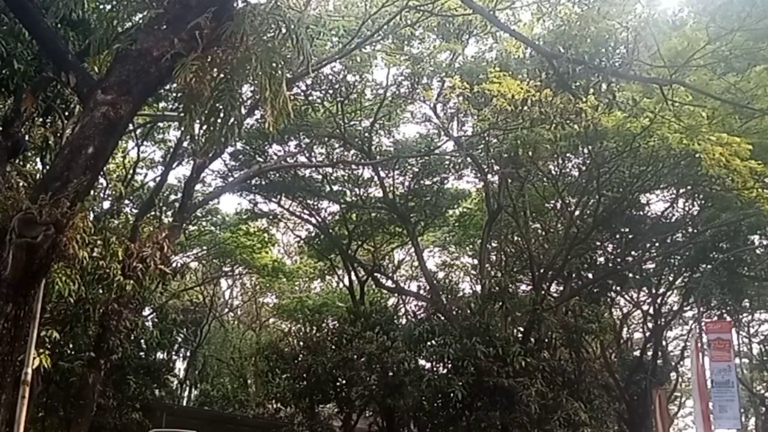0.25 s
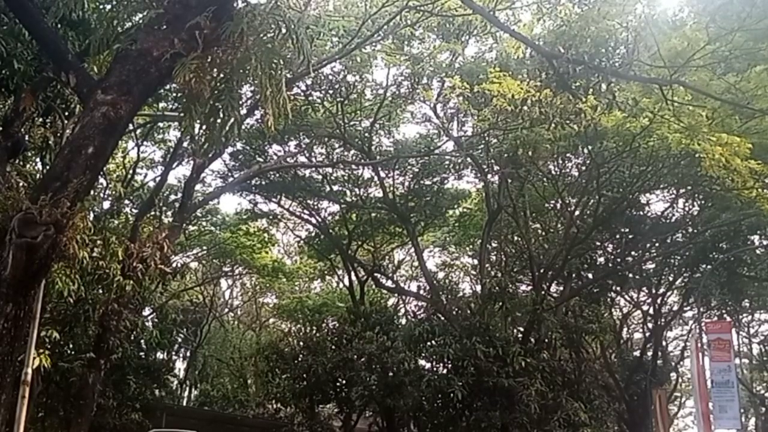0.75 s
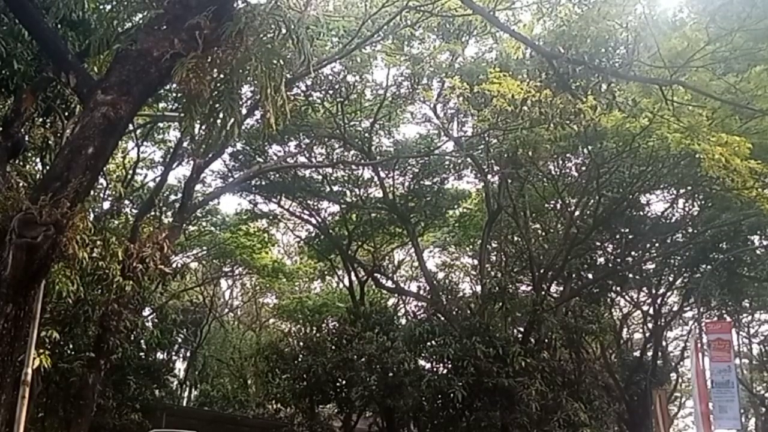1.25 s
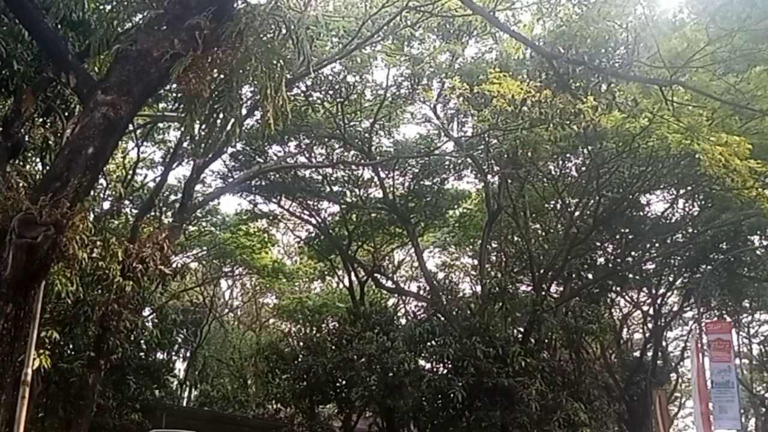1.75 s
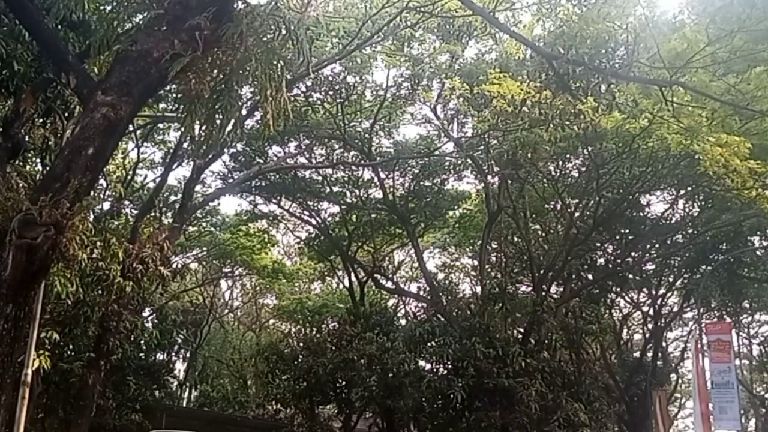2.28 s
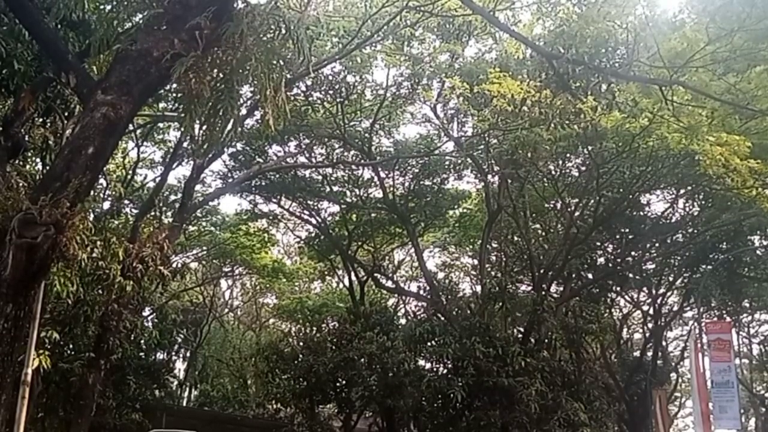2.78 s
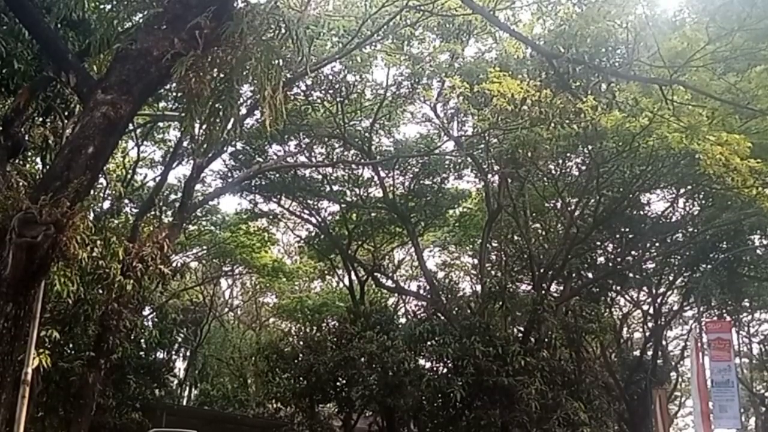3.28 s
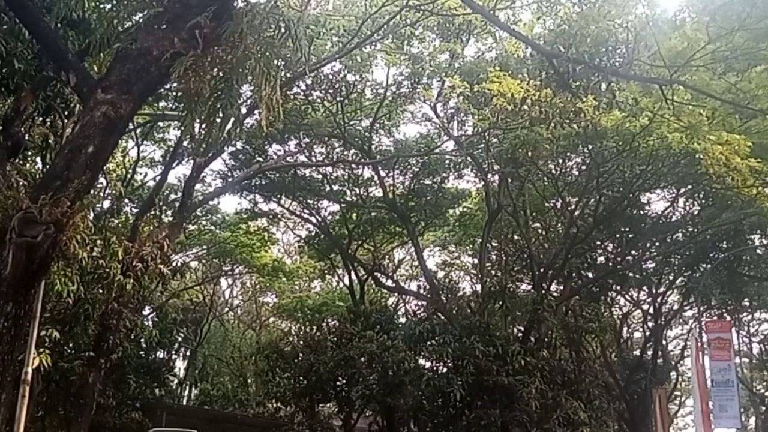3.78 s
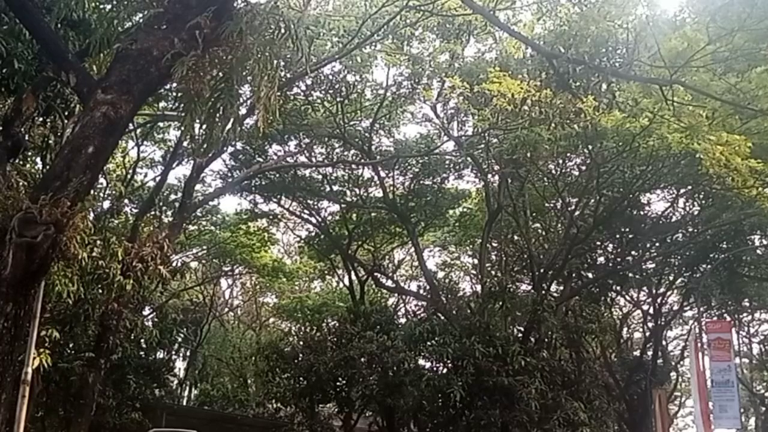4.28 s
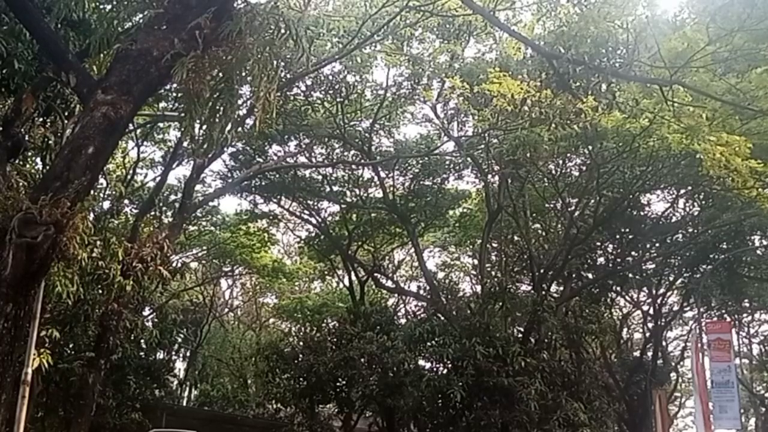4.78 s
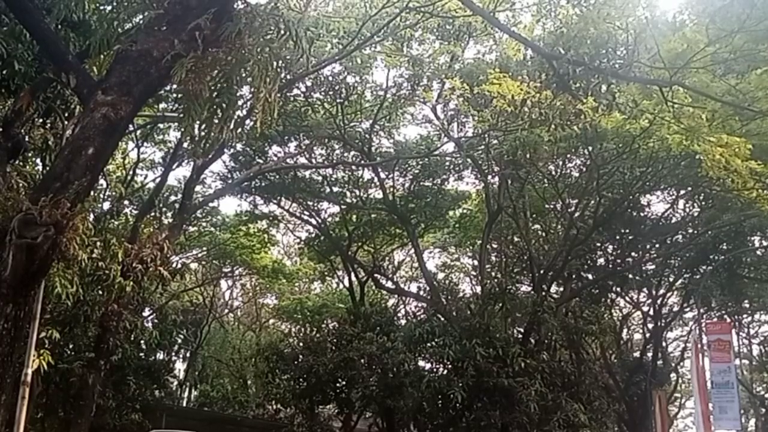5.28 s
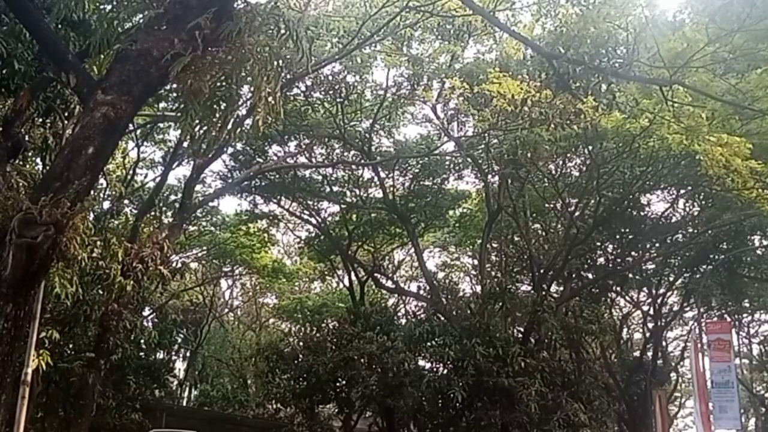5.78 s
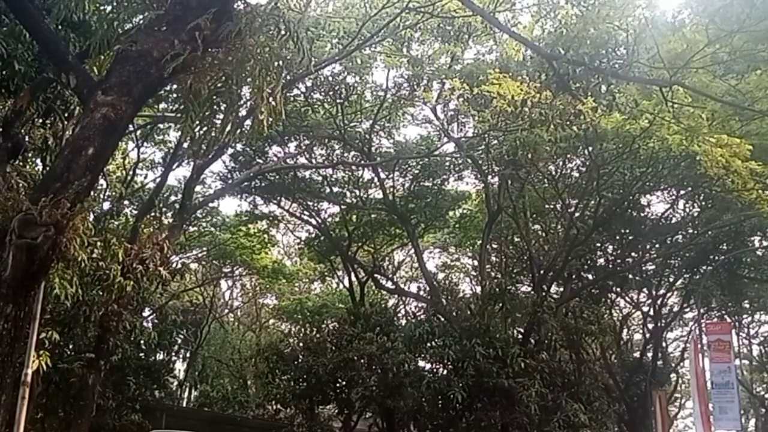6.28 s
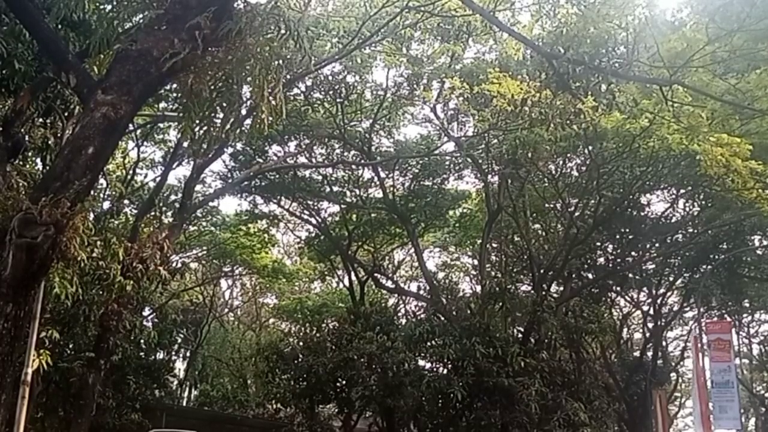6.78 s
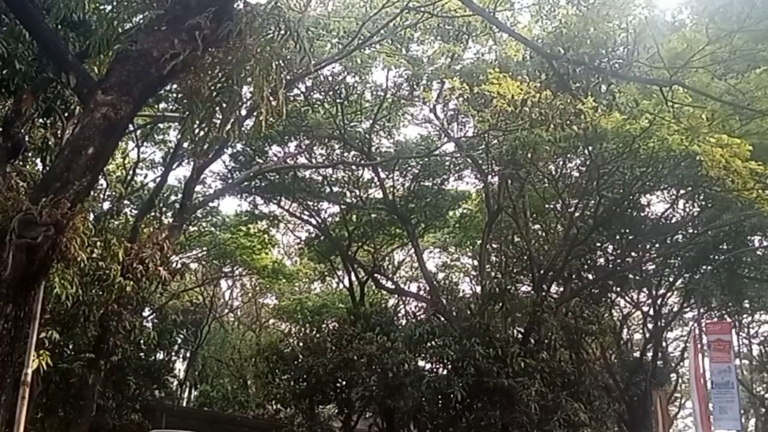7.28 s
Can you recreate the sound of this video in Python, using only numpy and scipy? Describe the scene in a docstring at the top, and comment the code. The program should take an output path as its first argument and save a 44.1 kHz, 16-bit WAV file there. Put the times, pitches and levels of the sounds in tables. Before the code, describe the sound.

Loud high bird chips, a raspy chatter, then a quick run of slurred whistles among trees, with soft deep traffic rumbling underneath.

```python
"""A street lined with trees: small birds call close overhead while traffic rumbles below.
Sharp warbled chips come first, then a buzzy chatter, a few more chips, then a run of slurred whistles.
Each call is a gliding tone; leaves scatter it as many tiny echoes, fainter birds answer, a twig ticks once.
The traffic is shaped noise; one engine is a low tone with one overtone that comes and goes.
The recorder's limiter ducks the whole sound, street included, when the calls are too loud."""
import sys
import numpy as np
from scipy import signal
from scipy.fft import rfft, irfft, next_fast_len
from scipy.io import wavfile
from scipy.ndimage import uniform_filter1d, minimum_filter1d, map_coordinates

SR = 44100
rng = np.random.default_rng(int(sys.argv[2]) if len(sys.argv) > 2 else 0)


def materialize(psi):
    """Save the field psi as 16-bit PCM at rate SR to the path in sys.argv[1].

    A 1-D psi becomes a single channel; in a 2-D psi each row is a channel.
    """
    bounded = np.clip(np.atleast_2d(psi).T, -1, 1)
    quanta = np.round(bounded * 32767).astype(np.int16)
    wavfile.write(sys.argv[1], SR, quanta)


N = 332514
TIME = np.arange(N) / SR

# Levels in the tables are set before echoes, mixing and microphone. Positive left-right dB: left is louder.
# Spectrum of the traffic noise: (frequency [Hz], relative level per Hz [dB])
STREET_SPECTRUM = [(25, -15), (45, -21), (70, -6.5), (100, 0), (200, -7.5), (400, -17.5), (800, -24),
                   (1600, -26), (4000, -29), (7500, -36), (9000, -54.5), (13500, -45.5), (15300, -66.5)]
# How alike the street is on both sides: (frequency [Hz], correlation [-1 to 1])
STREET_LIKENESS = [(30, 0.79), (70, 1), (125, 0.96), (250, 0.94), (500, 0.76), (1000, -0.15), (2000, -0.02),
                   (8000, -0.0024)]
# Loudness of the traffic: (time [s], level [dB])
TRAFFIC_LEVEL = [(0, -19.5), (.4, -18.5), (.8, -20), (2.2, -19.5), (3.6, -19.5), (4.8, -19.5), (6.6, -19.5),
                 (7.54, -20.3)]
# Exhaust note of one engine: (time [s], firing rate [Hz], level [dB])
ENGINE_NOTE = [(0, 98, -22.5), (.5, 100, -22), (1.5, 112, -45), (4.2, 110, -23), (4.7, 112, -21),
               (5.3, 110, -22), (5.8, 108, -18), (6.6, 106, -14.5), (7.0, 107, -20), (7.54, 112, -18)]
# Distant birds: (start [s], length [s], first pitch [Hz], last pitch [Hz], level [dB])
FAR_BIRD_CALLS = [(2.11, 0.05, 4150, 4050, -47.5), (2.183, 0.16, 4490, 4470, -32.5),
                  (3.396, 0.095, 4155, 4620, -30.5), (3.545, 0.095, 6490, 5650, -25.5),
                  (3.743, 0.079, 5220, 5790, -26), (3.797, .04, 5100, 5070, -37),
                  (4.095, 0.065, 5500, 5220, -34), (4.158, 0.043, 4440, 3850, -27),
                  (7.433, 0.088, 4400, 4720, -30)]
# Resonance of the small birds' throat and beak: (frequency [Hz], gain [dB])
THROAT_RESONANCE = [(3000, -24), (3800, -6), (5000, -8.5), (6300, 1), (7100, -0.5), (8300, -18.5),
                    (9300, -23.5), (11000, -23.5), (15000, -25.5)]
# Warbled chips: (start [s], length [s], onset pitch [Hz], crest pitch [Hz], first dip pitch [Hz],
# last dip pitch [Hz], time to the first dip [s], warbles [per s], level [dB], fade over the note [dB],
# beak opening [factor on the throat resonance], left-right [dB])
CHIP_NOTES = [(0.444, 0.042, 5070, 9470, 7560, 6700, 0.025, 100, 13.5, -0.5, 1.094, 1),
              (0.899, 0.053, 4900, 8530, 6550, 6550, 0.016, 124, 12.5, 19, 1.13, -2.5),
              (1.460, 0.047, 4800, 8700, 6860, 6180, 0.013, 89, 21, -3, 0.99, 1.5),
              (1.7882, .054, 5590, 8800, 6520, 6260, 0.008, 75, 19, -11, 1, 2.5),
              (3.614, 0.036, 3450, 9300, 5300, 5400, .021, 62, 17.5, 2, 1.026, 4),
              (3.923, 0.061, 3700, 9460, 6470, 6160, .019, 101, 19, -2, 1, 1.5),
              (4.329, 0.13, 5430, 9360, 7380, 8700, 0.029, 52.5, 7, 7.5, 1.176, 0)]
# Buzzy notes: (start [s], length [s], pitch [Hz], upward scoop [share of pitch], warble rate [Hz],
# warble depth [share of pitch], level [dB], fundamental at the start [dB], left-right [dB])
BUZZ_NOTES = [(2.384, 0.073, 3890, 0.081, 324, 0.069, 12, 6, 0.5),
              (2.549, .063, 3835, .08, 289.6, 0.066, 14, 4.5, 0),
              (2.868, 0.061, 3270, 0.04, 245, 0.056, 17.5, 3, 5),
              (2.977, .061, 3270, 0.11, 352, 0.036, 18.5, 2, 3),
              (3.092, 0.055, 3243, .09, 310, .058, 16.5, 3.5, 2.5),
              (3.209, .058, 3710, 0.14, 339, 0.074, 12.5, 7, .5)]
# Overtones of the whistler: (frequency of the overtone [Hz], level relative to the note [dB])
WHISTLE_OVERTONES = [(5000, -22), (6200, -19), (7500, -27.5), (9000, -37), (12500, -47)]
# Arched whistles: (start [s], length [s], first pitch [Hz], turning pitch [Hz], last pitch [Hz],
# place of the turn [0-1], level [dB], crescendo [dB], left-right [dB], left-right drift over the note [dB])
ARCHED_WHISTLES = [(4.906, 0.056, 4030, 5460, 3930, 0.51, 9.5, 13, -1.5, -9),
                   (4.921, 0.05, 4500, 4930, 4800, 0.56, 4.5, 2, 11, 1),
                   (5.057, .039, 3910, 4110, 4970, 0.4, 2, 17, 3, 12),
                   (5.099, 0.0253, 4450, 4410, 4180, 0, 7, -2, 8, 2),
                   (5.179, .042, 4230, 4180, 3980, .3, -3, 2, -4, -2),
                   (5.221, 0.05, 4320, 4327, 3830, 0.1, -0.5, -8, 5.5, 10),
                   (5.504, 0.1, 4130, 4227, 3710, 0.6, 0.5, 14, 7.5, -8),
                   (5.584, 0.044, 3790, 3560, 3140, 0.69, 1.5, -7.5, 1, 5),
                   (5.724, 0.072, 3480, 4090, 3630, 0.63, 1.5, 17, 8.5, 5),
                   (5.91, 0.078, 4210, 4334, 3650, 0.48, 6.5, 12.5, 2.5, 14),
                   (6.264, .086, 3687, 4136, 3760, .65, 6.5, 9.5, 8, -6),
                   (6.624, 0.096, 3666, 3693, 3528, 0.43, 4, 8, 5.5, 1),
                   (6.822, .047, 2606, 2967, 2350, 0.55, 0.5, -1, 6, 2),
                   (6.987, .042, 3656, 3586, 4075, 0.3, -5, 18, 7.5, 5),
                   (7.025, 0.024, 3970, 4030, 3880, 0.33, 1.5, -5, 0, -7),
                   (7.057, 0.023, 3960, 4245, 3860, 0.42, 11, -12, -2.5, 4)]
# Falling slurs: (start [s], length [s], first pitch [Hz], last pitch [Hz], level [dB], crescendo [dB],
# left-right [dB])
FALLING_SLURS = [(5.311, 0.076, 3435, 2820, -0.5, 15, 6.5), (6.045, 0.074, 3574, 2777, -1, 14, 6.5),
                 (6.414, 0.088, 3095, 2415, -4, 4.5, 1), (6.769, .060, 3090, 2590, -4, 12, 5.5),
                 (7.129, .080, 3362, 2666, -1.5, 6.5, 10)]
# Treble of the left and of the right microphone: (frequency [Hz], gain [dB])
LEFT_TREBLE = [(8000, 0), (10500, 7), (13500, -3), (15300, 11)]
RIGHT_TREBLE = [(8000, 0), (10500, -11), (13500, -16.5), (15300, 2.5)]

CUTOFF_HZ = 15850
UPSWEEP_S, CREST_SAG_HZ_PER_S = .0035, 7000   # how fast a chip leaps to its crest; how the crests sink
OVERTONE_FLICKER_DB = 3.5
ARCH_BEND, SLUR_EASE = 1.6, 0.46   # roundness of an arch; share of a slur that eases in and out


def from_db(db):
    """Turn decibels into gain."""
    return 10 ** (np.asarray(db) / 20)


def rms_one(x):
    """Scale to an average strength (rms) of 1."""
    return x / np.sqrt(np.mean(x ** 2) + 1e-20)


def curves(rows, t):
    """Join the points of each table column by straight lines, read at times t."""
    s, *columns = np.transpose(rows)
    return [np.interp(t, s, c) for c in columns]


def at_hz(points, hz):
    """Read a spectrum on a log-frequency axis."""
    f, value = np.transpose(points)
    return np.interp(np.log(np.maximum(hz, 1)), np.log(f), value)


def drift(rate, size):
    """Smooth chance of spread 1 that changes about rate times a second."""
    knots = rng.standard_normal(1024 + size // 32)
    return map_coordinates(knots, [np.arange(size) * rate / SR], order=3, mode="wrap")


def phase_of(hz):
    """Add up a moving pitch into a running phase."""
    return 2 * np.pi * np.cumsum(hz) / SR


def gate(t, attack, release):
    """Soft start and end of a note on its own time axis."""
    rise = np.clip((t - t[0]) / attack, 0, 1)
    fall = np.clip((t[-1] - t) / release, 0, 1)
    return np.sin(np.pi / 2 * rise * fall) ** 2


def swell(along, arch_db, crescendo_db):
    """Effort in dB along a note (0-1): an arch around the middle, leaning towards one end."""
    return crescendo_db * (along - .5) - arch_db * (2 * along - 1) ** 2


def add(out, start, note, pan_db):
    """Place a note in the stereo field."""
    i = int(start * SR)
    sides = np.array([note * from_db(pan_db / 2), note * from_db(-pan_db / 2)])
    out[:, i:i + len(note)] += sides[:, :N - i]


def street(lump_db=2.0, pan_db=1.0):
    """Tyres and many engines blend into a rumble, most alike on both sides in the bass."""
    hz = np.arange(N // 2 + 1) * SR / N
    mid, side = rfft(rng.standard_normal((2, N)))
    alike = np.clip(at_hz(STREET_LIKENESS, hz), -1, 1)
    sides = np.array([[1], [-1]])
    # a shared part and an opposite part together give the wanted likeness
    stereo = np.sqrt(1 + alike) * mid + sides * np.sqrt(1 - alike) * side
    noise = irfft(stereo * from_db(at_hz(STREET_SPECTRUM, hz)) * (hz > 22), N)
    level_db = curves(TRAFFIC_LEVEL, TIME)[0] + lump_db * drift(10, N)
    return rms_one(noise) * from_db(level_db + sides * pan_db / 2)


def engine(wander=0.03, throb_db=2.0, second_db=-17):
    """The exhaust note of one vehicle: a tone at the firing rate and its octave, throbbing unevenly."""
    hz, level_db = curves(ENGINE_NOTE, TIME)
    phase = phase_of(hz * (1 + wander * drift(18, N)))
    loudness = from_db(level_db + throb_db * drift(16, N))
    return loudness * (np.sin(phase) + from_db(second_db) * np.sin(2 * phase))


def twig(start=3.418, level_db=-38, t60=0.095):
    """A faint dry tick among the branches: a burst of bright noise that dies away."""
    t = TIME[:SR // 10]
    out = np.zeros((2, N))
    bright_noise = np.diff(rng.standard_normal(len(t) + 1))
    tick = bright_noise * from_db(level_db - 60 * t / t60)
    add(out, start, tick * gate(t, 0.0024, .01), 2)
    return out


def far_birds(waver=0.051):
    """Faint quavering slurs from trees further off, each one wavering pure tone."""
    out = np.zeros((2, N))
    for start, length, first_hz, last_hz, level_db in FAR_BIRD_CALLS:
        t = np.arange(int(length * SR)) / SR
        hz = np.linspace(first_hz, last_hz, len(t)) * (1 + waver * drift(249, len(t)))
        add(out, start, from_db(level_db) * gate(t, 0.011, 0.02) * np.sin(phase_of(hz)), 0)
    return out


def scatter(x, t60, build_up, echoes_per_s):
    """Many small echoes off leaves and trunks, different at each microphone, dying away."""
    t = TIME[:SR]
    echoes = rng.standard_normal((2, SR)) * (rng.random((2, SR)) < echoes_per_s / SR)
    echoes = echoes * from_db(-60 * t / t60) * (1 - np.exp(-t / build_up))
    echoes = echoes / np.sqrt(np.sum(echoes ** 2, axis=1, keepdims=True) + 1e-20)
    return signal.fftconvolve(x, echoes, axes=1)[:, :N]


def left_later(x, lag_s):
    """Sound arriving at a slant reaches the left microphone a little later."""
    size = next_fast_len(N + 64)
    hz = np.arange(size // 2 + 1) * SR / size
    late = irfft(rfft(x[0], size) * np.exp(-2j * np.pi * hz * lag_s), size)
    return np.array([late[:N], x[1]])


def syrinx(hz, partials_db, beak=1):
    """Harmonics of one vibrating membrane, shaped by the throat resonance, which an open beak raises."""
    phase = phase_of(hz)
    tone = 0
    for k, db in enumerate(partials_db, 1):
        loudness = from_db(db + at_hz(THROAT_RESONANCE, k * hz / beak))
        audible = k * hz < SR / 2   # leave out what digital sound cannot hold
        tone = tone + loudness * audible * np.sin(k * phase)
    return tone


def chips(jitter=0.022, attack=0.00086, release=0.0024, swell_db=7.0, early_warble=.2):
    """A steep upsweep breaks into a fast warble, which the throat turns into a few pulses."""
    out = np.zeros((2, N))
    rasp, uneven = .04, .16
    for (start, length, onset_hz, crest_hz, first_dip_hz, last_dip_hz, dip_s, rate,
         level_db, fade_db, beak, pan_db) in CHIP_NOTES:
        t = np.arange(int(length * SR)) / SR
        turns = (t - dip_s) * rate
        # 0 at a crest, about 1 in a dip; shallower before the first dip
        dip = np.cos(np.pi * turns) ** 2 * np.where(turns < -.5, early_warble, 1)
        dip = dip * (1 + uneven * drift(rate, len(t)))
        crests_hz = crest_hz - CREST_SAG_HZ_PER_S * t
        dips_hz = np.interp(t, [dip_s, length], [first_dip_hz, last_dip_hz])
        warble_hz = (1 - dip) * crests_hz + dip * dips_hz
        hz = warble_hz + (onset_hz - warble_hz) * np.exp(-t / UPSWEEP_S)
        hz = hz * (1 + jitter * drift(886, len(t)))
        effort = from_db(level_db + swell(t / length, swell_db, -fade_db))
        effort = effort * (1 + rasp * drift(6700, len(t)))
        add(out, start, effort * gate(t, attack, release) * syrinx(hz, [0, -16], beak), pan_db)
    return out


def buzzes(swell_db=15.0, crest=.62, brighten_db=13.0, throb_db=3.0):
    """A fast, ragged vibrato also chops the loudness; the fundamental fades against its overtones."""
    out = np.zeros((2, N))
    jitter, rasp, unsteady, flutter_db = .014, .05, .18, 1.7
    for (start, length, pitch_hz, scoop, warble_hz, depth,
         level_db, fundamental_db, pan_db) in BUZZ_NOTES:
        t = np.arange(int(length * SR)) / SR
        from_crest = (t / length / crest - 1) ** 2   # pitch and loudness arch around this crest
        warble = np.sin(phase_of(warble_hz * (1 + unsteady * drift(150.3, len(t)))))
        hz = pitch_hz * (1 - scoop * from_crest + depth * warble + jitter * drift(707, len(t)))
        effort_db = level_db - swell_db * from_crest - throb_db * warble
        effort = from_db(effort_db + flutter_db * drift(365, len(t)))
        fundamental = fundamental_db - brighten_db * t / length + 2 * flutter_db * drift(782, len(t))
        tone = syrinx(hz, [fundamental, 0, -10, -8], beak=1.022)
        raspy_tone = tone * (1 + rasp * drift(4700, len(t)))
        add(out, start, effort * gate(t, 0.0025, 0.0048) * raspy_tone, pan_db)
    return out


def whistle(hz, level_db, crescendo_db, swell_db=5.5, waver=0.0089, flutter_db=1.5, rasp=0.021,
            attack_share=0.13, release=0.0028):
    """A nearly pure gliding tone with faint overtones that swells; longer notes start more softly."""
    t = TIME[:len(hz)]
    phase = phase_of(hz * (1 + waver * drift(299.2, len(t))))
    tone = np.sin(phase)
    for k in range(2, 4):
        overtone_db = at_hz(WHISTLE_OVERTONES, k * hz) + OVERTONE_FLICKER_DB * drift(95, len(t))
        tone = tone + from_db(overtone_db) * np.sin(k * phase)
    effort_db = level_db + swell(t / t[-1], swell_db, crescendo_db) + flutter_db * drift(162, len(t))
    roughness = 1 + rasp * drift(3000, len(t))
    return tone * from_db(effort_db) * roughness * gate(t, attack_share * t[-1], release)


def whistles():
    """The song: high notes that bend around a turning point, mixed with lower falling slurs."""
    out = np.zeros((2, N))
    for (start, length, first_hz, turn_hz, last_hz, turn,
         level_db, crescendo_db, pan_db, pan_drift_db) in ARCHED_WHISTLES:
        along = np.linspace(0, 1, int(length * SR))
        from_turn = np.interp(along, [0, np.clip(turn, .01, .99), 1], [1, 0, 1])
        end_hz = np.where(along < turn, first_hz, last_hz)
        hz = turn_hz + (end_hz - turn_hz) * from_turn ** ARCH_BEND
        add(out, start, whistle(hz, level_db, crescendo_db), pan_db + pan_drift_db * (along - .5))
    for start, length, first_hz, last_hz, level_db, crescendo_db, pan_db in FALLING_SLURS:
        along = np.linspace(0, 1, int(length * SR))
        fallen = (1 - SLUR_EASE) * along + SLUR_EASE * np.sin(np.pi / 2 * along) ** 2
        hz = first_hz + (last_hz - first_hz) * fallen
        add(out, start, whistle(hz, level_db, crescendo_db), pan_db)
    return out


def scene():
    """Birds above the street: direct sound, quick echoes off near leaves, a long tail from the grove."""
    high = left_later(chips(), lag_s=.00001) + left_later(buzzes(), lag_s=.000033)
    low = left_later(whistles(), lag_s=.00007)
    far = far_birds()
    near_high = from_db(-8) * scatter(high, t60=.06, build_up=.002, echoes_per_s=2500)
    near_low = from_db(-5.0) * scatter(low, t60=0.073, build_up=0.00047, echoes_per_s=3100)
    into_grove = from_db(-21.5) * high + from_db(-17) * low + far
    grove = scatter(into_grove, t60=0.42, build_up=0.0065, echoes_per_s=1200)
    birds = high + low + from_db(-4.5) * far + near_high + near_low + grove
    return birds + twig() + street() + engine()


def microphone(x, peak_hz=15200, sharpness=22.0, peak_db=8.5):
    """The small sound ports ring at the very top of the treble; the right one is duller below that."""
    hz = np.arange(N // 2 + 1) * SR / N
    x = irfft(rfft(x) * from_db([at_hz(LEFT_TREBLE, hz), at_hz(RIGHT_TREBLE, hz)]), N)
    ringing = signal.lfilter(*signal.iirpeak(peak_hz, sharpness, fs=SR), x)
    return x + from_db(peak_db) * ringing


def limiter(x, ceiling=1.0, recovery_s=0.11):
    """One gain for both sides drops at once under a peak, holds briefly and creeps back."""
    peak = np.abs(x).max(axis=0)
    top = min(ceiling, 1)
    # the shifted window looks slightly ahead and holds each drop for about 14 ms
    needed = minimum_filter1d(top / np.maximum(peak, top), size=661, origin=300)
    clock = TIME / recovery_s
    # each cut fades away exponentially unless a deeper one takes over
    cut = np.exp(np.maximum.accumulate(np.log(1 - needed + 1e-12) + clock) - clock)
    return x * uniform_filter1d(1 - cut, size=56)


def record(dry):
    """Microphone colour, limiter and a steep top cut."""
    limited = limiter(microphone(dry))
    top_cut = signal.ellip(12, .1, 90, CUTOFF_HZ, fs=SR, output="sos")
    return signal.sosfilt(top_cut, limited)


dry = scene()
out = record(dry)
materialize(out)
```